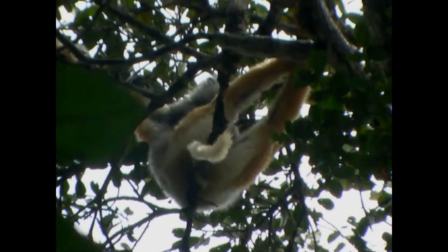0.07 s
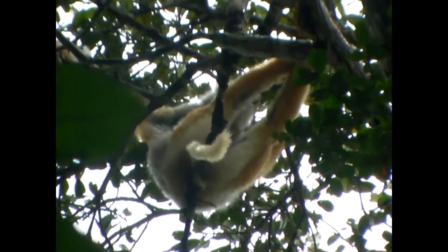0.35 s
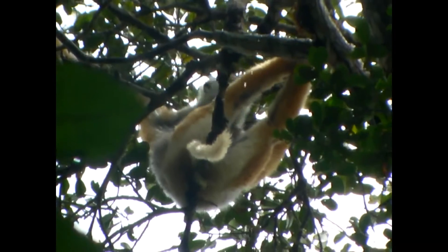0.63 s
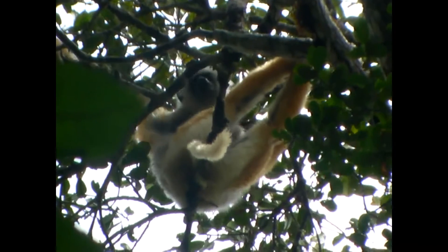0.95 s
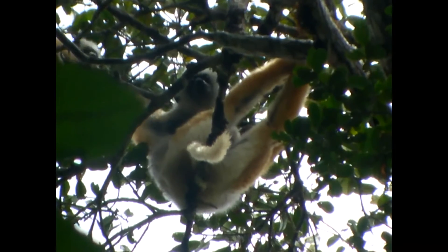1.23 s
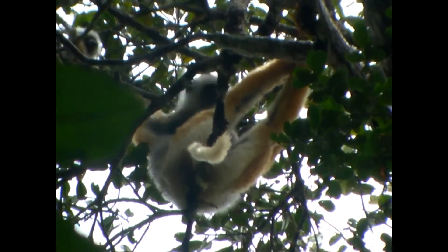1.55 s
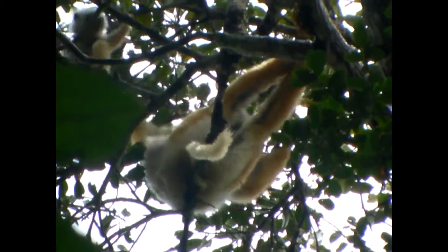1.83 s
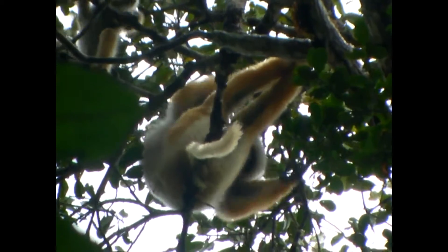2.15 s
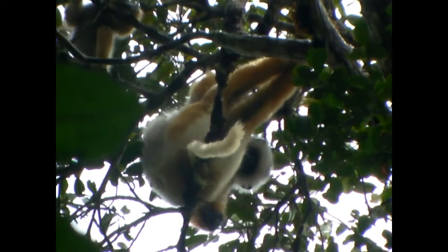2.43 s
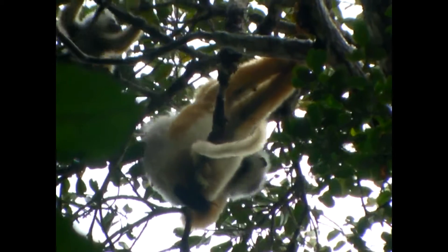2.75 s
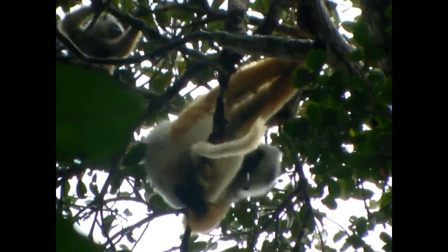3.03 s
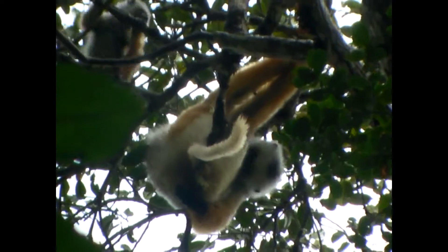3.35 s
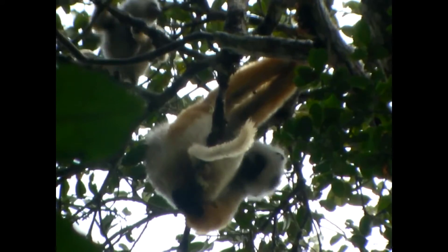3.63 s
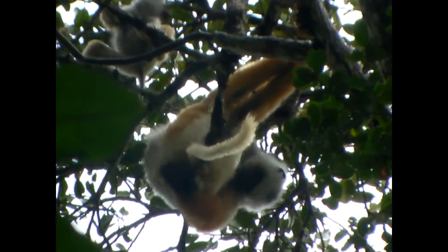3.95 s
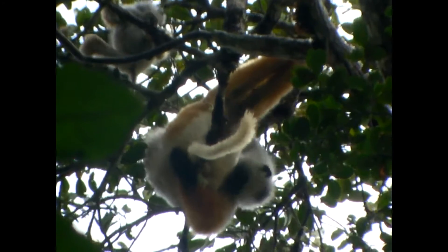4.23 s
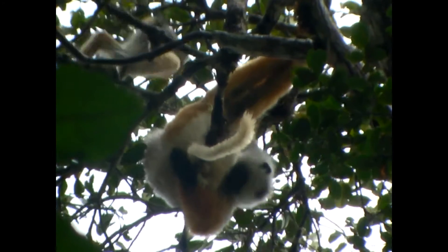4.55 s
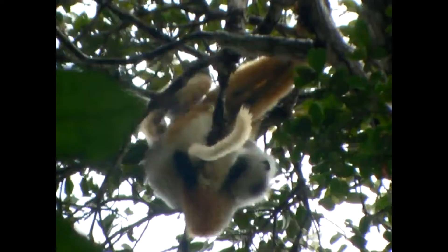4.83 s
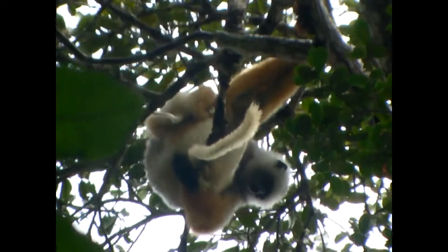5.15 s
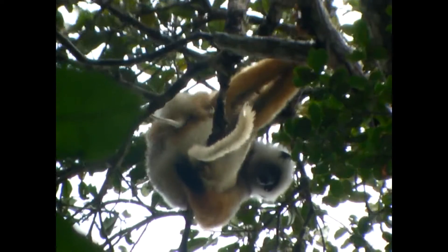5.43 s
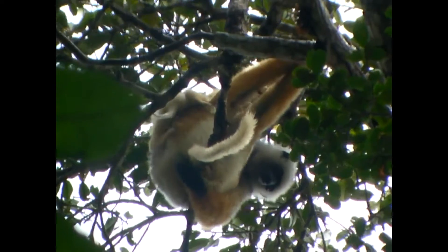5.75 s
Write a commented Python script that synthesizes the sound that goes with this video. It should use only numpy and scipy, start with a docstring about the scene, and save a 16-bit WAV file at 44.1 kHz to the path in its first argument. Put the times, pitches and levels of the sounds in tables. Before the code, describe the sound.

Heard from below in a quiet forest, foliage rustles crisply as lemurs move about the canopy, with soft bumps of wood and small twig cracks echoing briefly among the trunks. After a short lull the rustle builds to one loud slap of leaves as a branch springs, followed by more snaps before things settle. A distant bird trills once, and a small bird gives faint high chirps.

```python
"""Two lemurs clamber about in a forest canopy overhead, above the faint hush of the forest.
First leaves swish as their edges catch and slip; then boughs knock and twigs snap, each crack scattering
among the trunks. A bird trills far off, and as the rustle ebbs a small bird takes up one thin high note.
The leaves stir again, a branch whips under a leap just after four seconds, and more twigs break
before the foliage settles."""
import sys
import numpy as np
from scipy import signal
from scipy.fft import rfft, irfft, next_fast_len
from scipy.io import wavfile

SR = 44100
rng = np.random.default_rng(int(sys.argv[2]) if len(sys.argv) > 2 else 0)


def log_audio(samples):
    """Write samples as a 16-bit WAV file to the path given in sys.argv[1]."""
    # one column per channel
    frames = np.atleast_2d(samples).T
    # limit to full scale, then quantise
    limited = np.clip(frames, -1, 1)
    pcm = np.round(limited * 32767).astype(np.int16)
    wavfile.write(sys.argv[1], SR, pcm)


N = 255339
TIME = np.arange(N) / SR


def from_db(db):
    """Amplitude ratio: tenfold for every 20 dB."""
    return 10 ** (np.asarray(db) / 20)


def rms_one(x):
    """Normalisation to unit mean power."""
    return x / np.sqrt(np.mean(x ** 2) + 1e-20)


def energy_one(x):
    """Normalisation to unit energy per channel."""
    return x / np.sqrt(np.sum(x ** 2, axis=-1, keepdims=True) + 1e-20)


def in_time(rows):
    """Linear interpolation in time, one curve per column."""
    s, *columns = np.transpose(rows)
    return [np.interp(TIME, s, c) for c in columns]


def at_hz(points, hz):
    """Interpolation on a logarithmic frequency axis."""
    f, value = np.transpose(points)
    return np.interp(np.log(hz + 1), np.log(f), value)


def panned(left_db):
    """Interchannel level difference, as left and right gains."""
    return from_db(np.array([[.5], [-.5]]) * left_db)


def drift(per_s):
    """Random modulation of unit rms."""
    knots = rng.standard_normal(4096)
    return rms_one(np.interp(TIME * per_s, np.arange(len(knots)), knots))


def surge(peak_s, rise_s, decay_s):
    """Transient envelope: Gaussian rise, exponential decay."""
    t = TIME - peak_s
    return np.exp(-(np.minimum(t, 0) / rise_s) ** 2 - np.maximum(t, 0) / decay_s)


def resonate(x, hz, width_hz):
    """Damped two-pole resonator with unit peak gain."""
    r = np.exp(-np.pi * abs(width_hz) / SR)
    feedback = [1, -2 * r * np.cos(2 * np.pi * hz / SR), r * r]
    return signal.lfilter(np.array([1, 0, -1]) * (1 - r * r) / 2, feedback, x + 1e-18)


def ring(x, resonances):
    """Resonant filtering: parallel resonances of alternating sign."""
    return sum((-1) ** k * from_db(db) * resonate(x, hz, width)
               for k, (hz, width, db) in enumerate(resonances))


def add(out, s, sound):
    """Superposition of a short sound, starting at time s."""
    start = max(int(s * SR), 0)
    out[..., start:start + sound.shape[-1]] += sound[..., :N - start]


# likeness of left and right: (frequency [Hz], correlation [ratio])
COHERENCE = [(100, 0.6), (1200, 0.65), (3400, 0.67), (4500, 0.1), (8000, 0.1), (12500, 0.043),
             (16000, 0.13)]
def spread(pair, left_lag_s=.000032):
    """Partial coherence: two independent signals mix, alike in the bass and less so in the treble."""
    size = next_fast_len(pair.shape[-1])
    hz = np.fft.rfftfreq(size, 1 / SR)
    angle = np.arcsin(np.clip(at_hz(COHERENCE, hz), -1, 1)) / 2
    spectra = rfft(pair, size)
    spectra = np.cos(angle) * spectra + np.sin(angle) * spectra[::-1]
    spectra[0] *= np.exp(-2j * np.pi * hz * left_lag_s)
    return irfft(spectra, size)[:, :pair.shape[-1]]


def coloured(pair, spectrum):
    """Spectral shaping of a partly coherent stereo texture, at unit rms."""
    size = next_fast_len(N)
    gain = from_db(at_hz(spectrum, np.fft.rfftfreq(size, 1 / SR)))
    return rms_one(irfft(rfft(spread(pair), size) * gain, size)[:, :N])


def canopy(x, near_db, near_s, far_db, far_s):
    """Multiple scattering: dense echoes off nearby boughs, a longer tail from farther trunks."""
    t = np.arange(SR // 2) / SR
    near = energy_one(rng.standard_normal((2, len(t))) * np.exp(-t / near_s) * (t > .001))
    far = energy_one(rng.standard_normal((2, len(t))) * np.exp(-t / far_s) * (t > .008))
    echoes = spread(from_db(near_db) * near + from_db(far_db) * far)
    return x + signal.fftconvolve(x, echoes, axes=1)[:, :N]


# far-off air: (frequency [Hz], relative spectral density [dB])
AIR_SPECTRUM = [(15, -72), (25, -22), (97, -11.5), (217, -17), (344, -31), (427, -2.5), (476, -15),
                (714, -14.5), (775, -28), (962, -17), (1040, -15), (1400, -25), (1650, -39), (5880, -15.5),
                (16000, -19.5)]
# hollow low ring in the background: (time [s], level [dB])
HOLLOW_LEVELS = [(0, -74), (0.85, -73), (1.15, -62), (2.1, -68), (3.2, -72.5), (5.79, -71.5)]
def hush(air_db=-61):
    """Filtered noise: steady far-off air, and a hollow ring from two resonances in series."""
    air = from_db(air_db) * coloured(rng.standard_normal((2, N)), AIR_SPECTRUM)
    hollow_db, = in_time(HOLLOW_LEVELS)
    hollow = resonate(spread(rng.standard_normal((2, N))), hz=373, width_hz=123)
    hollow = resonate(hollow, hz=454, width_hz=230)
    return air + from_db(hollow_db) * rms_one(hollow)


def thrum(hz=204):
    """Amplitude modulation: a soft low tone swells briefly among the branches."""
    return from_db(-56) * surge(5.01, rise_s=.015, decay_s=.015) * np.sin(2 * np.pi * hz * TIME)


# a small bird's peeps and a few lower notes: (peak time [s], relative level [dB], pitch [Hz])
BIRD_NOTES = [(0.952, -55, 2630), (2.305, -57, 3230), (2.93, -51, 3356), (2.983, -47.5, 3450),
              (3.575, -42, 3510), (4.144, -47, 2130), (4.181, -49, 2470), (4.871, -43, 3520),
              (5.488, -43, 3520)]
def birds(trill_start_s=1.86, trill_step_s=.046, echo_s=.05, echo_db=-7):
    """Frequency modulation: thin notes rise slightly and quaver, and the trees reflect them."""
    notes = np.zeros(N)
    quaver = 1 + .015 * drift(per_s=600)
    far_trill = [(trill_start_s + k * trill_step_s, -58, 2277) for k in range(9)]
    for s, db, hz in BIRD_NOTES + far_trill:
        width_s = .0338 * (hz / 3515) ** 1.9  # lower notes are shorter
        along = np.clip((TIME - s) / width_s, -4, 4)
        pitch = hz * (1 + .0043 * along) * quaver
        notes += from_db(db) * np.exp(-3 * along ** 2) * np.sin(2 * np.pi * np.cumsum(pitch) / SR)
    echo = from_db(echo_db) * np.interp(TIME - echo_s, TIME, notes)
    song = from_db(-5.5) * (notes + echo) * panned(-.5)
    return canopy(song, near_db=-4, near_s=.03, far_db=-4, far_s=.14)


def leaf_ticks(per_s, size_db, rub):
    """Stick-slip friction: leaf edges tick at random, blurred by nearby leaves, over smooth rubbing."""
    sizes = from_db(size_db * np.minimum(rng.exponential(1, (2, N)), 5))
    signs = rng.choice([-1, 1], (2, N))
    ticks = sizes * signs * (rng.random((2, N)) < per_s / SR) / np.sqrt(per_s)
    t = np.arange(SR // 40) / SR
    decay = np.exp(-t / .00041) + .25 * np.exp(-t / .012)
    blurs = energy_one(rng.standard_normal((6, 2, len(t))) * decay)  # one impulse response per spray
    spray = rng.integers(0, len(blurs), N)
    crackle = sum(signal.oaconvolve(ticks * (spray == k), blur, axes=1)[:, :N]
                  for k, blur in enumerate(blurs))
    return rms_one(crackle) + rub * rng.standard_normal((2, N))


# stirring of the foliage: (time [s], relative low level [dB], relative crisp level [dB])
RUSTLE_LEVELS = [(0.0, -54, -57.5), (0.19, -56.5, -52), (0.39, -58.5, -60), (0.79, -60.5, -59),
                 (1.06, -60, -62), (2.69, -67, -68.5), (2.92, -65, -67), (3.14, -63.5, -62.5),
                 (3.3, -62, -61.5), (3.48, -57, -52), (3.84, -58.5, -51), (3.97, -59, -53),
                 (4.26, -53.5, -52.5), (4.39, -57.5, -49.5), (4.56, -54, -47.5), (5.01, -53.5, -50),
                 (5.55, -60.5, -57.5), (5.79, -61.5, -58.5)]
# sprays brushing together: (peak time [s], low level [dB], relative crisp level [dB], decay time [s])
LEAF_SWISHES = [(0.04, -49.5, -48, 0.035), (0.133, -47, -45, 0.057), (0.276, -54, -49, 0.058),
                (0.553, -51.5, -54, 0.026), (0.621, -53, -46.5, .014), (0.744, -57.5, -53, .022),
                (0.985, -55.5, -60.5, 0.045), (1.062, -61, -59, 0.016), (1.732, -53, -63, .015),
                (2.586, -58, -65.5, 0.018), (3.06, -66, -59, 0.078), (3.291, -57, -53.5, 0.067),
                (3.411, -55.5, -58, 0.042), (3.516, -45, -42, 0.029), (3.733, -49.5, -57, 0.012),
                (3.9, -51.5, -49, 0.085), (4.667, -46, -47, 0.018), (4.758, -45.5, -45, 0.019),
                (4.81, -50, -42, 0.065), (5.683, -58.5, -58, .02)]
# low and crisp parts of the rustle: (frequency [Hz], relative spectral density [dB])
LOW_SPECTRUM = [(15, -54), (25, -22), (90, -6), (172, -4.5), (286, -10), (408, 1.5), (477, -2.5),
                (665, -0.5), (812, -2.5), (1440, -1.5), (1730, -1.5), (2200, -0.5), (3000, 1), (5000, -9),
                (6500, -15), (11000, -120)]
CRISP_SPECTRUM = [(2350, -40), (4000, -15.5), (5410, -11), (8550, -1), (9660, -5.5), (11400, -3.5),
                  (14600, -12.5), (16000, -29.5)]
def foliage(rise_share=.58, crisp_left_db=-4):
    """Shot noise: the harder the leaves are stirred, the louder and denser their ticking."""
    low_db, crisp_db = in_time(RUSTLE_LEVELS)
    low, crisp = from_db(low_db + 1), from_db(crisp_db + 1.04)
    for s, low_db, crisp_db, decay_s in LEAF_SWISHES:
        swell = surge(s, rise_share * decay_s, decay_s)
        low = np.hypot(low, from_db(low_db) * swell)  # incoherent sources add in power
        crisp = np.hypot(crisp, from_db(crisp_db + 1.5) * swell)
    ticks_per_s = 1300 * (crisp / from_db(-54) + .033) ** .7
    flutter = from_db(.89 * drift(per_s=55))
    ticks = leaf_ticks(ticks_per_s, size_db=3, rub=.63) * flutter
    low_rustle = low * coloured(ticks, LOW_SPECTRUM) * panned(.46)
    crisp_rustle = crisp * coloured(ticks, CRISP_SPECTRUM) * panned(crisp_left_db)
    return low_rustle + crisp_rustle


# boughs bumping: (time [s], level [dB], pitch [Hz])
BOUGH_KNOCKS = [(0.532, -40, 486), (0.612, -34.5, 485), (1.058, -49, 440), (1.142, -50, 400),
                (2.018, -48.5, 530), (2.187, -48, 377), (2.437, -45.5, 410), (2.555, -51.5, 553)]
def boughs(rise_s=.0036, rebound_s=.012, rebound_db=-19):
    """Damped impact: a bump dies within a few cycles, with a dull scuff of bark, and rebounds once."""
    out, t = np.zeros((2, N)), np.arange(SR // 20) / SR
    dull = signal.butter(2, [70, 900], "band", fs=SR, output="sos")
    contact = t / rise_s * np.exp(1 - t / rise_s)
    for s, db, hz in BOUGH_KNOCKS:
        bump = contact ** 3 * np.sin(2 * np.pi * hz * t)
        scuff = contact * rms_one(signal.sosfilt(dull, rng.standard_normal(len(t))))
        scuff_db = db / 2 - 32.5  # hard bumps are mostly tone
        knock = (from_db(db) * bump + from_db(scuff_db) * scuff) * panned(1.1)
        add(out, s, knock)
        add(out, s + rebound_s, from_db(rebound_db) * knock)
    return canopy(out, near_db=-11, near_s=.023, far_db=-9, far_s=.13)


def splinters(t, length_s, clean_share):
    """Progressive fracture: fibres give way ever harder up to the break at t = 0, then ever more weakly."""
    swell = np.exp(-np.abs(t) / (length_s * np.where(t < 0, .5, 1)))
    fibres = energy_one(rng.standard_normal(len(t)) * (rng.random(len(t)) < .3) * swell)
    impulse = np.diff(t >= 0, prepend=False)
    return clean_share * impulse + np.sqrt(1 - clean_share ** 2) * fibres


# resonances colouring a snap's low body and bright crack: (frequency [Hz], width [Hz], relative gain [dB])
SNAP_BODY_COLOUR = [(118, 96, 4), (410, 95, 7), (583, 147, 4), (1090, 205, 1), (1440, 330, 0),
                    (2330, 500, -1.5), (3340, 420, 0), (5130, 6100, -10)]
SNAP_CRACK_COLOUR = [(5560, 820, -16), (8140, 1950, 2), (11050, 490, 4), (14000, 4200, -11)]
# twigs breaking, claws catching on bark: (time [s], relative level [dB], pitch [Hz], crispness [dB])
TWIG_SNAPS = [(0.037, -38, 2430, -9), (0.641, -39, 2460, -6.5), (0.684, -42.5, 2500, -6.5),
              (0.986, -42, 560, -13), (1.141, -48.5, 1800, -25), (1.249, -42.5, 2180, -21),
              (1.318, -33.5, 1820, -13.5), (1.608, -48, 1250, -27), (1.744, -42.5, 2000, -7),
              (1.872, -49.5, 646, -38), (2.017, -41, 1440, -13.5), (2.067, -42.5, 684, -30),
              (2.168, -43, 597, -35), (2.187, -46, 950, -20), (2.222, -45, 610, -5),
              (2.433, -49.5, 535, -25), (3.017, -57, 3440, 2), (3.6525, -39.5, 3220, 11),
              (3.965, -39.5, 3200, -5.5), (4.371, -34, 1690, -22), (4.592, -39.5, 2940, -6),
              (5.133, -34.5, 2400, -8), (5.173, -43, 3170, -5.5), (5.313, -38, 2700, -10.5),
              (5.396, -44, 1870, -5.5)]
def twigs(lead_s=.008, break_delay_s=.0024):
    """Impulsive excitation: each break has a low body and a bright crack; thick wood yields gradually."""
    bodies, cracks = np.zeros((2, N)), np.zeros((2, N))
    t = np.arange(SR // 16) / SR - lead_s - break_delay_s  # each snap sounds just after its listed time
    dull = signal.butter(2, 5500, fs=SR, output="sos")
    bright = signal.butter(2, 2500, "high", fs=SR, output="sos")
    for s, db, hz, crisp_db in TWIG_SNAPS:
        thinness = min(hz / 2000, 1)
        length_s = .0034 / (1 + from_db(crisp_db)) / thinness ** .16  # crisp twigs go faster
        clean_share = .53 * thinness ** 1.1  # the part of the break that comes at once
        breaks = np.array([splinters(t, length_s, clean_share) for side in range(2)])
        body = signal.sosfilt(dull, resonate(ring(breaks[0], SNAP_BODY_COLOUR), hz, width_hz=2.16 * hz))
        crack = signal.sosfilt(bright, ring(breaks, SNAP_CRACK_COLOUR))
        add(bodies, s - lead_s, from_db(db + 18) * energy_one(body) * panned(1))
        add(cracks, s - lead_s, from_db(db + crisp_db + 25) * energy_one(crack) * panned(-3))
    bodies = canopy(bodies, near_db=-5, near_s=.018, far_db=-13, far_s=.06)
    cracks = canopy(cracks, near_db=-1, near_s=.018, far_db=-8, far_s=.055)
    return bodies + cracks


# a leafy branch whipping: (peak time [s], relative level [dB], rise time [s], decay time [s])
BRANCH_WHIPS = [(4.252, -40, 0.022, 0.034), (4.276, -26.5, 0.012, 0.025), (4.352, -33.5, 0.051, 0.069),
                (4.375, -30.5, 0.0097, 0.032)]
# slapping leaves: (frequency [Hz], relative spectral density [dB])
SLAP_SPECTRUM = [(40, -37), (160, -11), (290, -22), (410, -4.5), (800, -10.5), (1400, -8), (1700, -5),
                 (2500, -5.5), (3150, -1.5), (4700, -5.5), (8000, -1.5), (9800, -8), (11200, -5),
                 (15800, -17)]
def leap():
    """Incoherent summation: many leaves slap at once under a leap, their treble more from the right."""
    power = sum((from_db(db) * surge(s, rise, decay)) ** 2 for s, db, rise, decay in BRANCH_WHIPS)
    slaps = coloured(leaf_ticks(per_s=9000, size_db=2.5, rub=.38), SLAP_SPECTRUM)
    body = signal.sosfiltfilt(signal.butter(2, 4200, fs=SR, output="sos"), slaps)
    treble = from_db(2) * (slaps - body)
    return np.sqrt(power) * (body * panned(.24) + treble * panned(-3))


def scene():
    """Linear superposition of all that reaches the forest floor."""
    return foliage() + leap() + twigs() + boughs() + thrum() + birds() + hush()


def record(dry, cutoff_hz=15850):
    """Band limiting: an elliptic low-pass cuts the top steeply."""
    return signal.sosfilt(signal.ellip(12, .1, 80, cutoff_hz, fs=SR, output="sos"), dry)


dry = scene()
out = record(dry)
log_audio(out)
```